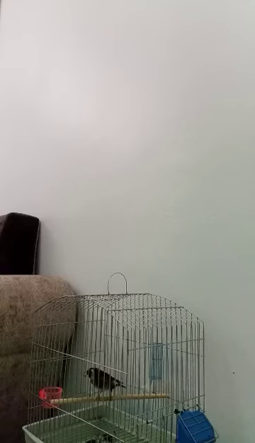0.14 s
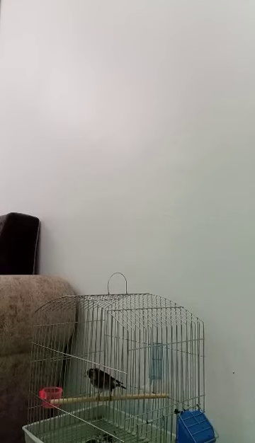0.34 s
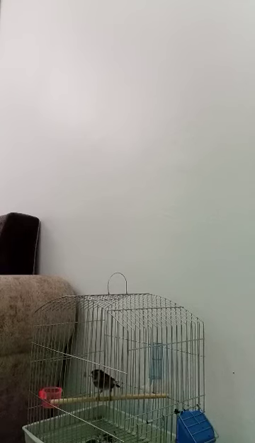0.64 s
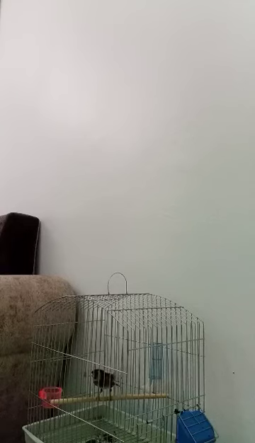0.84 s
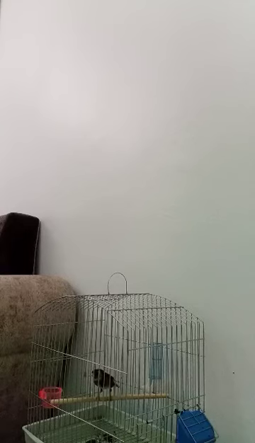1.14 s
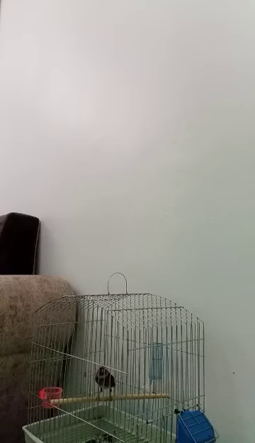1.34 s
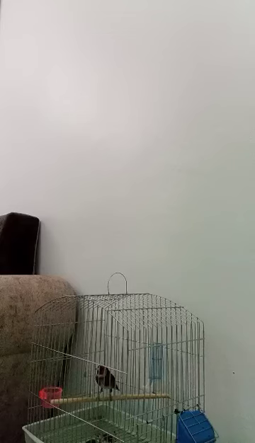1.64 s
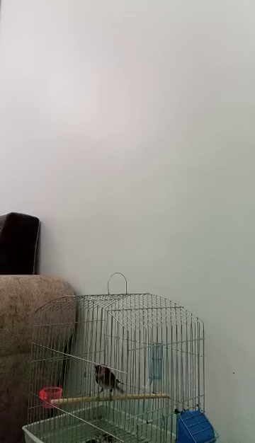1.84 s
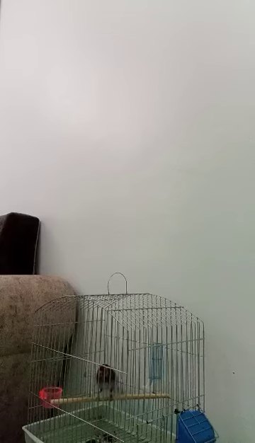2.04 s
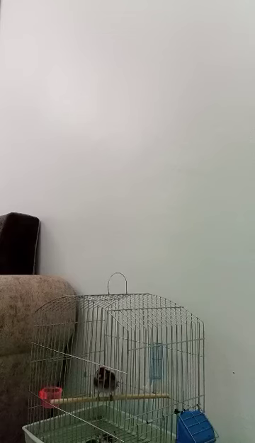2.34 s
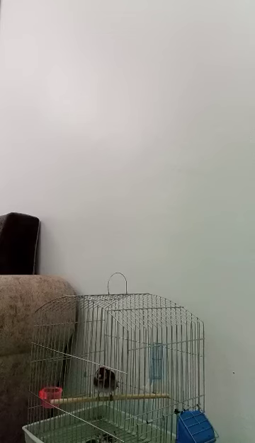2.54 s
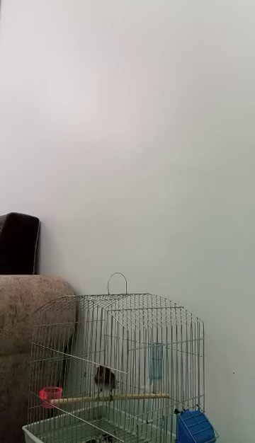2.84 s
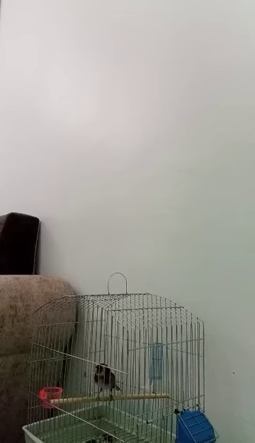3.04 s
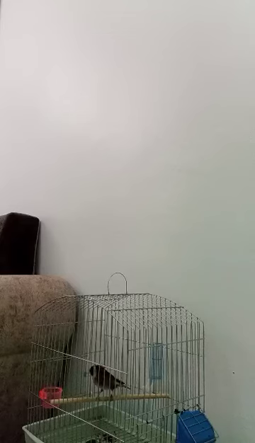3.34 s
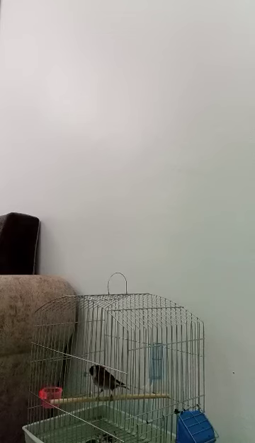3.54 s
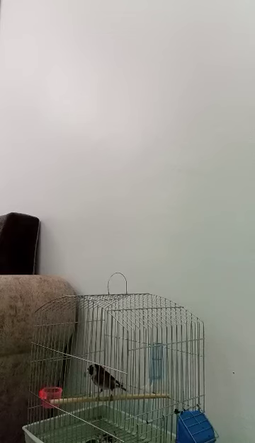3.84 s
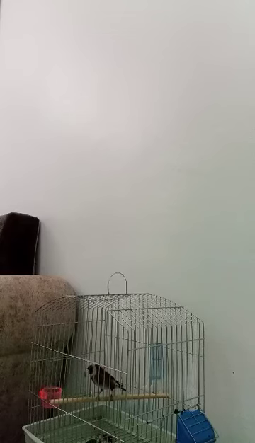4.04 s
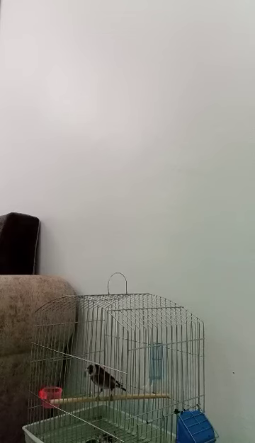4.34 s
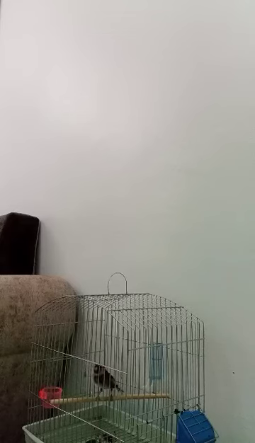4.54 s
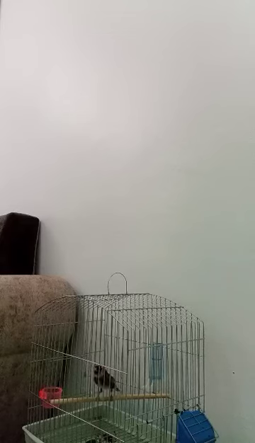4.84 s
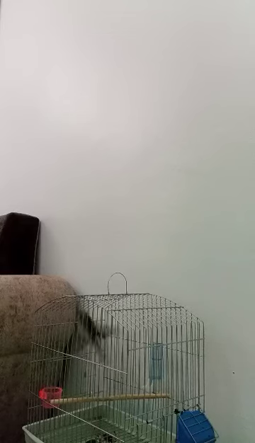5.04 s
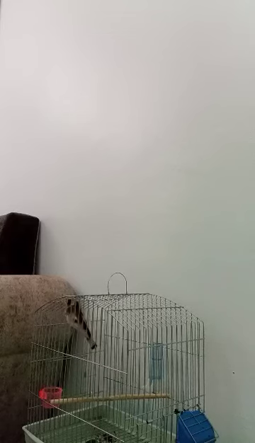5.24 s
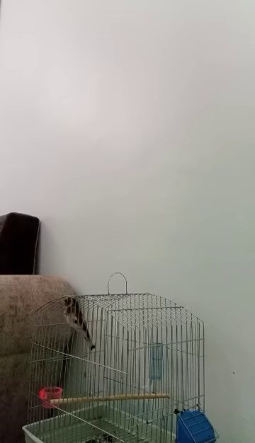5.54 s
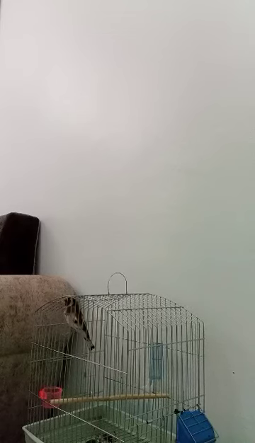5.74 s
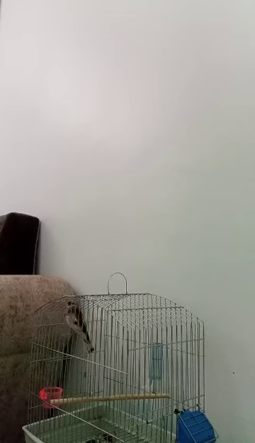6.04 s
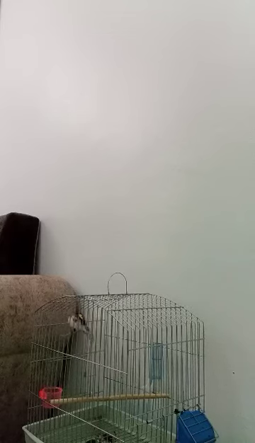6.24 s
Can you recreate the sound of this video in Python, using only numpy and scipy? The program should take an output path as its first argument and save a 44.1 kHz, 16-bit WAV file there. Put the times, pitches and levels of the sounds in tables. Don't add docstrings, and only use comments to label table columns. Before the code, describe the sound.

A small caged finch gives sparse, sharp rising chirps and thin whistles in a quiet hard-walled room, then flutters up onto ringing cage wires.

```python
import sys
import numpy as np
from scipy import signal
from scipy.fft import rfft, irfft
from scipy.io import wavfile
from scipy.ndimage import uniform_filter1d

SR = 44100
rng = np.random.default_rng(int(sys.argv[2]) if len(sys.argv) > 2 else 0)


def output_pcm(signal):
    pcm = np.clip(np.atleast_2d(signal).T, -1, 1) * 32767
    wavfile.write(sys.argv[1], SR, np.round(pcm).astype(np.int16))


def how_loud(loudness_db):
    steps = np.asarray(loudness_db, float) / 20
    return 10 ** steps


N = 281358

# start_s, first_hz, last_hz, peak_db, overtone_db
CHIRPS = [
    (.7965, 2485, 4366, -22.5, -35.5),
    (1.8825, 2335, 4368, -24, -31.5),
    (2.042, 2420, 4274, -19.5, -27),
    (3.3795, 2443, 4168, -19, -36),
    (3.4875, 2652, 4355, -21, -37.5),
    (4.896, 2420, 4390, -20.5, -35),
    (4.9835, 2446, 4400, -19.5, -39),
    (5.082, 2520, 4240, -23, -26),
    (5.183, 2395, 4303, -22, -32.5),
]
WIDE_CHIRPS = [
    (1.7125, 1857, 4183, -27.5, -32.5),
]
HOOKS = [
    (1.3915, 2086, 2705, -31, -24),
]
LOW_CHIRPS = [
    (5.9725, 1978, 3290, -36, -20.5),
    (6.1745, 1836, 3253, -36, -17.5),
    (6.311, 1981, 3300, -41.5, -19.5),
]
WHISTLES = [
    (-.102, 5750, 5426, -32.5, -30.5),
    (.5575, 5303, 5162, -29, -25.5),
    (2.9015, 5720, 5443, -29, -27),
    (3.8455, 5700, 5280, -23.5, -33.5),
]
SLIDES = [
    (-.046, 2245, 3340, -23.5, -43.5),
    (.628, 2276, 3332, -23, -50),
    (2.966, 2246, 3364, -22.5, -40.5),
    (3.910, 2277, 3359, -19.5, -44),
]
# length_share, glide_share, effort_db
CHIRP_SHAPE = [(0, 0, -29), (.15, .15, -15), (.32, .48, -2), (.47, 0.65, -1), (.63, .9, -7),
               (.8, 0.95, -10.5), (1, 1, -15.5)]
WIDE_SHAPE = [(0, 0.043, -23.5), (.15, .15, -10), (.35, .48, -6), (.5, .72, -0.5), (.65, .9, -5),
              (.8, 0.94, -10.5), (1, 1, -18.5)]
HOOK_SHAPE = [(0, 0, -24), (.25, .12, -15), (.45, .45, -2), (.65, .75, -0.5), (.85, 1, -3), (1, 0.9, -1.5)]
LOW_SHAPE = [(0, 0.035, -16.5), (.15, 0.085, -4), (0.351, .4, -2.5), (.55, 0.62, -1.5), (.72, .92, -8.5),
             (1, 1, -11.5)]
WHISTLE_SHAPE = [(0, 0.013, -18), (.2, .3, -12), (.45, .7, -3.5), (.6, .88, -1), (.85, .96, -3),
                 (0.999, 1, -6)]
SLIDE_SHAPE = [(0, 0.052, -21), (.12, .12, -16.5), (.43, .49, -21), (.58, .65, -18.5), (.68, 0.65, -6.5),
               (.76, .82, 0.3), (.87, .9, -1), (1, 0.94, -3.5)]
# third_db, fourth_db, effort_exponent, breath_db
CHIRP_UPPER = (-40, -66, 0.59, -56)
HOOK_UPPER = (-41, -58, .6, -70)
LOW_UPPER = (-27, -40, 0.7, -41)
WHISTLE_UPPER = (-68, -88, .35, -43.5)
SLIDE_UPPER = (-47.5, -66, 0.1, -56)
CHIRP_S, WIDE_S, HOOK_S, LOW_S, WHISTLE_S, SLIDE_S = 0.027, 0.031, 0.021, 0.037, 0.020, 0.055
NOTE_START_S, NOTE_STOP_S = 0.0012, 0.004
LEAD_SAMPLES = 8820

# since_s, delay_ms
WALL_LAG = [(-1, 2.2), (.5, 2.29), (.6, 2.205), (1.3, 1.96), (1.6, 2.21), (3.3, 2.143), (3.8, 2.24),
            (3.9, 2.2), (5.15, 2.135), (5.9, 1.41), (6.1, 1.3), (6.3, 1.37)]
WALL_DB, TABLE_LAG_S, TABLE_DB = -5.5, 0.004, -12

# start_s, length_s, level_db
RUSTLES = [(1.0, 0.094, -76.5), (1.967, 0.15, -76), (2.105, .14, -71.5), (2.225, 0.016, -63),
           (2.23, 0.14, -74), (2.299, .02, -70), (3.05, 0.13, -79.5), (5.08, 0.055, -55.5),
           (5.192, 0.1, -65), (6.008, 0.062, -66), (6.177, 0.066, -77)]
# freq_hz, density_db
FEATHERS = [(500, -6.5), (1000, -1), (2000, 0.5), (4000, -8), (7000, -13.5), (10000, -26.5), (13500, -31.5)]
FLUTTER_DB, FLUTTER_HZ = 3, 45

# time_s, level_db
LANDING = [
    (5.234, -60),
    (5.244, -56),
    (5.256, -68),
    (5.276, -64),
    (5.3, -58.5),
    (5.332, -64.5),
    (5.37, -61),
]
# freq_hz, level_db, t60_s
BARS = [(542, -7, 0.096), (882.8, -6.5, 0.1), (1006, -10.5, .06), (1137, -4, 0.053), (1230, -4, 0.032),
        (1350, -3, 0.065), (1452, -3.5, 0.16), (1546, -8.5, 0.18), (1640, -7, 0.12), (1636, -20, 0.074)]

# time_s, level_db
ROOM_BUILD = [(.005, -30), (.011, -3.5), (.022, -2.5), (.034, -2), (.043, -0.5), (.049, -2.5), (.09, -4.5)]
# freq_hz, t60_s
ROOM_T60 = [(1000, 0.39), (2500, 0.49), (3300, 0.37), (4200, 0.53), (5400, 0.4), (7000, 0.4), (9000, .22),
            (12000, 0.12)]
ROOM_DB, CAGE_SEND_DB = -33.5, 1.5

# start_s, length_s, level_db
SHAKES = [
    (-.04, .09, -65.5),
    (2.2, 0.078, -69),
    (4.94, 0.099, -65),
    (5.1, .11, -54.5),
    (5.25, 0.14, -56.5),
    (5.46, 0.068, -59.5),
    (6.0, .16, -59),
]
SHAKE_TOWN_DB, SHAKE_STIR_DB = -6, -8.5
# time_s, level_db
BUSTLE = [(0, 0.5), (.3, -2.5), (1.0, 0.5), (1.4, -2.5), (2.25, 4.5), (2.8, -4), (3.0, 2.5), (3.45, -1.5),
          (3.62, 3), (3.9, -0.5), (4.75, -1), (5.3, 5), (5.7, -1.5), (6.38, 4)]
# freq_hz, density_db
RUMBLE = [(15, -46.5), (25, -22.5), (45, -11), (75, 1.5), (92, -2.5), (113, -7), (170, -17.5), (220, -36),
          (370, -120)]
TOWN = [(82, -43.5), (140, -1.5), (323, 1.5), (452, -3.5), (524, -1), (612, -8.5), (750, -14.5),
        (980, -33.5), (1650, -120)]
STIR = [(380, -35), (650, -1.5), (870, 1), (973, -1.5), (1900, -5.5), (2470, -40.5), (4180, -120)]
DRONE = [(30, -80.5), (70, -14), (80, -2), (85, 0), (91, -3.5), (105, -16.5), (200, -90.5)]
AIR = [(1700, -11), (2000, -4), (2600, -10.5), (3490, -9.5), (3900, -14), (4600, -21.5), (5500, -23),
       (7000, -30), (9000, -41), (13000, -42.5)]
RUMBLE_DB, TOWN_DB, STIR_DB, AIR_DB = -66, -65.5, -72, -77
RUMBLE_FOLLOWS, STIR_FOLLOWS = 0.2, 0.7
# start_s, length_s, level_db
PASSES = [
    (1.95, .9, -66),
    (4.05, 1.0, -65),
    (5.05, 0.31, -60),
    (5.7, 0.21, -68.5),
]


def finch():
    direct, one_way, other_way = (
        sing(CHIRPS, CHIRP_S, CHIRP_SHAPE, CHIRP_UPPER)
        + sing(WIDE_CHIRPS, WIDE_S, WIDE_SHAPE, CHIRP_UPPER)
        + sing(HOOKS, HOOK_S, HOOK_SHAPE, HOOK_UPPER)
        + sing(LOW_CHIRPS, LOW_S, LOW_SHAPE, LOW_UPPER)
        + sing(WHISTLES, WHISTLE_S, WHISTLE_SHAPE, WHISTLE_UPPER)
        + sing(SLIDES, SLIDE_S, SLIDE_SHAPE, SLIDE_UPPER))
    heard = direct + room(one_way) + room(other_way)
    return heard[LEAD_SAMPLES:LEAD_SAMPLES + N]


def sing(notes, length_s, shape, upper):
    tracks = np.zeros((3, N + 2 * LEAD_SAMPLES))
    turns_rad = rng.uniform(0, 2 * np.pi, len(notes))
    for (start_s, first_hz, last_hz, peak_db, overtone_db), turn in zip(notes, turns_rad):
        note = how_loud(peak_db) * syrinx(first_hz, last_hz, overtone_db, length_s, shape, upper)
        at = LEAD_SAMPLES + round(start_s * SR)
        tracks[:, at:at + len(note)] += note * np.array([[1], [np.cos(turn)], [np.sin(turn)]])
        wall_lag_s = [ms for since_s, ms in WALL_LAG if since_s <= start_s][-1] / 1000
        for lag_s, echo_db in (wall_lag_s, WALL_DB), (TABLE_LAG_S, TABLE_DB):
            late = at + round(lag_s * SR)
            tracks[0, late:late + len(note)] += how_loud(echo_db) * note
    return tracks


def syrinx(first_hz, last_hz, overtone_db, length_s, shape, upper):
    third_db, fourth_db, effort_exponent, breath_db = upper
    share, glide, effort_db = np.transpose(shape)
    u = np.arange(int(length_s * SR)) / (length_s * SR)
    glide = uniform_filter1d(np.interp(u, share, glide), size=90, mode="nearest")
    phase = 2 * np.pi * np.cumsum(first_hz + (last_hz - first_hz) * glide) / SR
    swell = how_loud(uniform_filter1d(np.interp(u, share, effort_db), size=90, mode="nearest"))
    edge = np.minimum(u / NOTE_START_S, (1 - u) / NOTE_STOP_S) * length_s
    swell = swell * np.sin(np.pi / 2 * np.clip(edge, 0, 1)) ** 2
    second = how_loud(overtone_db) * np.sin(2 * phase)
    high = how_loud(third_db) * np.sin(3 * phase) + how_loud(fourth_db) * np.sin(4 * phase)
    breath_band = signal.butter(2, [5000, 8500], "band", fs=SR, output="sos")
    breath = how_loud(breath_db) * signal.sosfilt(breath_band, rng.standard_normal(len(u)))
    return swell * np.sin(phase) + swell ** effort_exponent * (second + swell * high + breath)


def feathers():
    return swells(RUSTLES) * coloured(FEATHERS) * how_loud(FLUTTER_DB * drift(FLUTTER_HZ))


def bars():
    out = np.zeros(N)
    at = [round(time_s * SR) for time_s, level_db in LANDING]
    grip_db = np.array(LANDING)[:, 1]
    for hz, mode_db, t60_s in BARS:
        clicks = np.full(N, 1e-18)
        strike_db = grip_db + mode_db + rng.normal(0, 2.0, len(at))
        clicks[at] = how_loud(strike_db) * rng.choice([-1, 1], len(at))
        radius, angle = how_loud(-60 / (t60_s * SR)), 2 * np.pi * hz / SR
        poles = [1, -2 * radius * np.cos(angle), radius * radius]
        out += signal.lfilter([0, np.sin(angle)], poles, clicks)
    return out


def room(track):
    t = np.arange(SR) / SR
    scatter_db = 1.5 * rng.standard_normal(SR // 40 + 1).repeat(40)[:SR]
    grains = rng.standard_normal(SR) * how_loud(scatter_db)
    tail = np.zeros(SR)
    for hz in np.geomspace(700, 14000, 14):
        band = signal.butter(1, [hz / 1.155, hz * 1.152], "band", fs=SR, output="sos")
        tail += signal.sosfilt(band, grains) * how_loud(-60 * t / at_hz(ROOM_T60, hz))
    tail = tail * how_loud(ROOM_DB + np.interp(t, *np.transpose(ROOM_BUILD), left=-90))
    return signal.fftconvolve(track, tail)[:len(track)]


def town_and_shakes():
    bustle_db = np.interp(np.arange(N) / SR, *np.transpose(BUSTLE))
    shake = swells(SHAKES)
    rumble = np.hypot(how_loud(RUMBLE_DB + RUMBLE_FOLLOWS * bustle_db), shake)
    town = np.hypot(how_loud(TOWN_DB + bustle_db), how_loud(SHAKE_TOWN_DB) * shake)
    stir = np.hypot(how_loud(STIR_DB + STIR_FOLLOWS * bustle_db), how_loud(SHAKE_STIR_DB) * shake)
    rumble = rumble * how_loud(2.0 * drift(10)) * coloured(RUMBLE)
    town = town * how_loud(2.3 * drift(14)) * coloured(TOWN)
    stir = stir * how_loud(1.1 * drift(25)) * coloured(STIR)
    return rumble + town + stir


def vehicles():
    return swells(PASSES) * coloured(DRONE)


def air():
    return how_loud(AIR_DB) * coloured(AIR)


def swells(rows):
    t = np.arange(N) / SR
    out = np.zeros(N)
    for start_s, length_s, level_db in rows:
        out += how_loud(level_db) * np.sin(np.pi * np.clip((t - start_s) / length_s, 0, 1))
    return out


def drift(rate_hz):
    knots = rng.standard_normal(int(N / SR * rate_hz) + 2)
    return np.interp(np.arange(N) / SR * rate_hz, np.arange(len(knots)), knots)


def coloured(spectrum):
    (low_hz, low_db), (high_hz, high_db) = spectrum[0], spectrum[-1]
    points = [(low_hz * 1.1, low_db - 30)] + list(spectrum) + [(high_hz * 1.2, high_db - 30)]
    gain = how_loud(at_hz(points, np.fft.rfftfreq(N, 1 / SR)))
    noise = irfft(rfft(rng.standard_normal(N)) * gain, N)
    return noise / noise.std()


def at_hz(points, hz):
    table_hz, values = np.transpose(points)
    return np.interp(np.log(hz + 1), np.log(table_hz), values)


def scene():
    cage = feathers() + bars()
    cage = cage + how_loud(CAGE_SEND_DB) * room(cage)
    return (finch() + cage + town_and_shakes() + vehicles() + air())[None]


def band_limit(x):
    return signal.sosfilt(signal.butter(12, 13030, fs=SR, output="sos"), x)


def record(dry):
    mix = dry * np.clip(np.arange(N) / SR / 0.00015, 0, 1)
    return band_limit(mix)


dry = scene()
out = record(dry)
output_pcm(out)
```